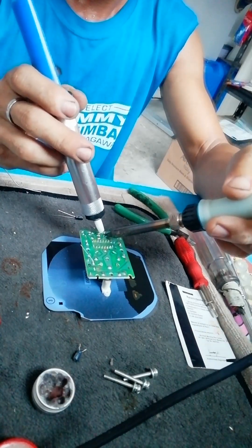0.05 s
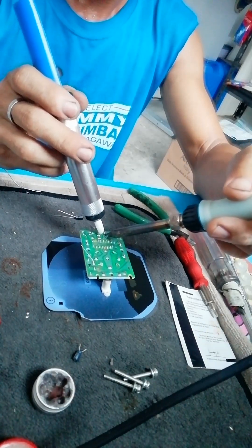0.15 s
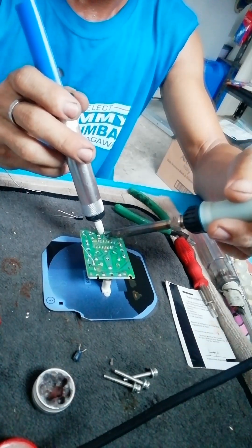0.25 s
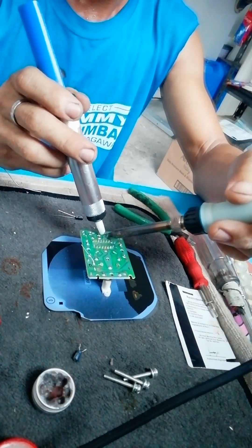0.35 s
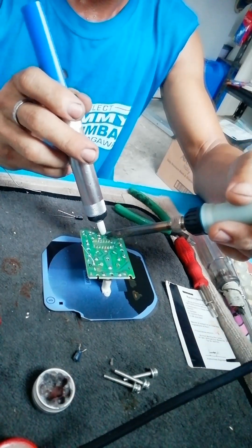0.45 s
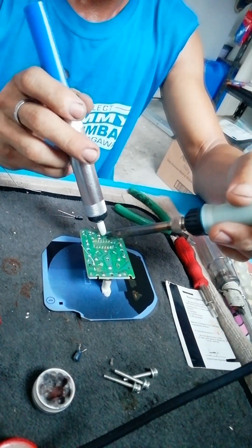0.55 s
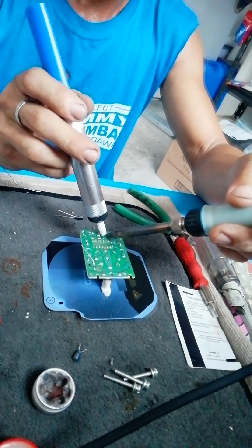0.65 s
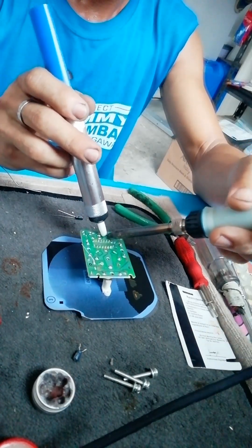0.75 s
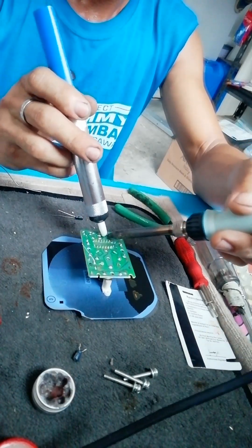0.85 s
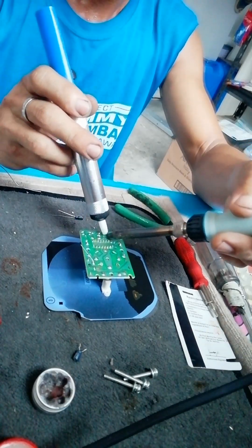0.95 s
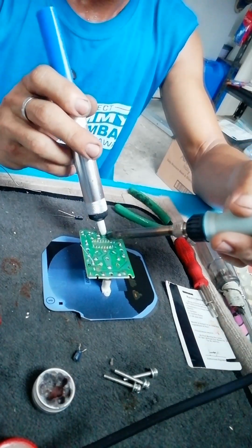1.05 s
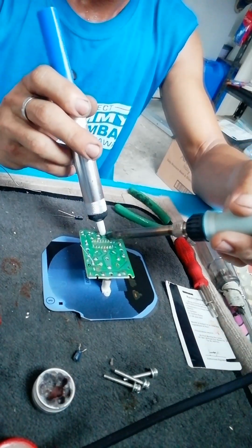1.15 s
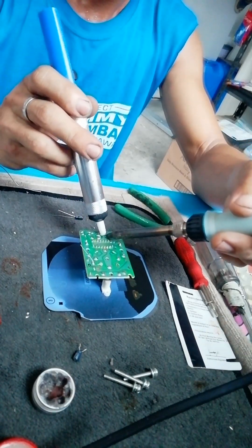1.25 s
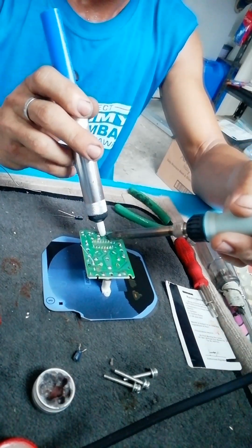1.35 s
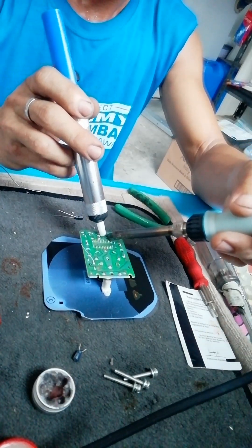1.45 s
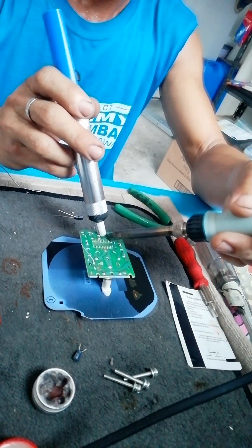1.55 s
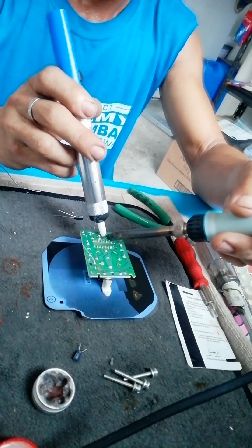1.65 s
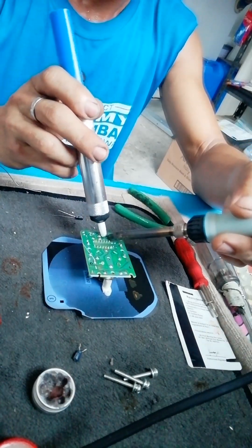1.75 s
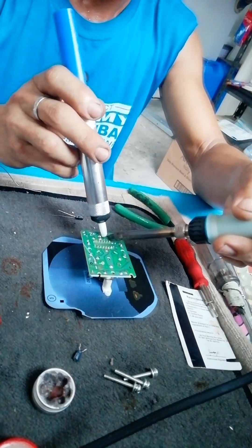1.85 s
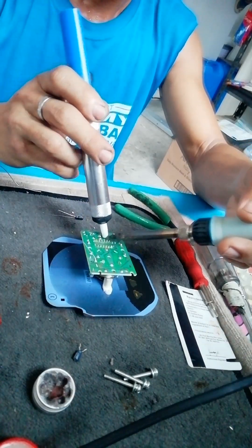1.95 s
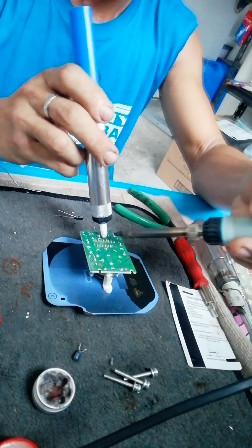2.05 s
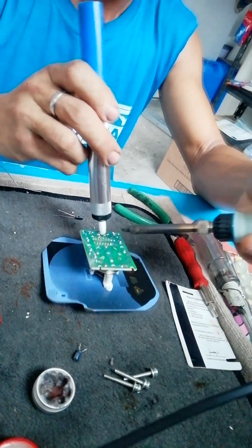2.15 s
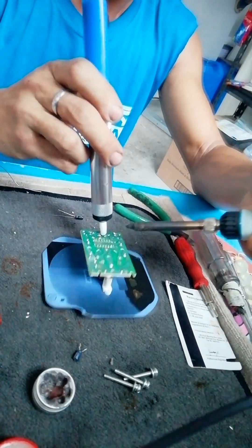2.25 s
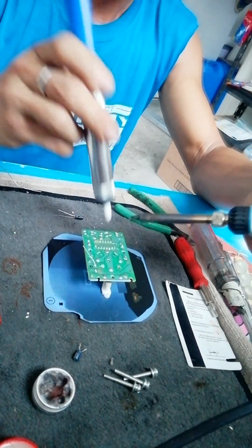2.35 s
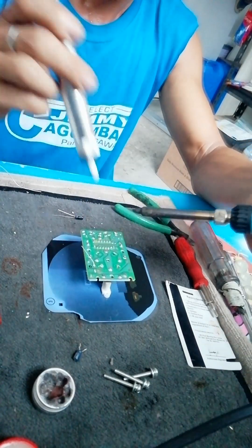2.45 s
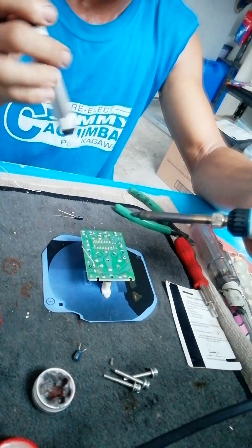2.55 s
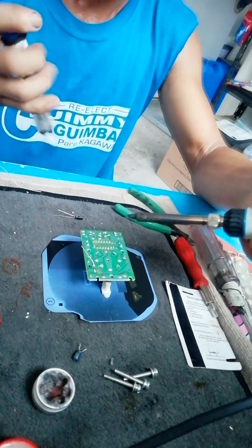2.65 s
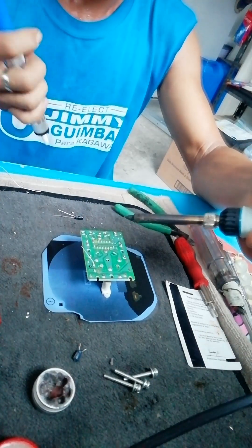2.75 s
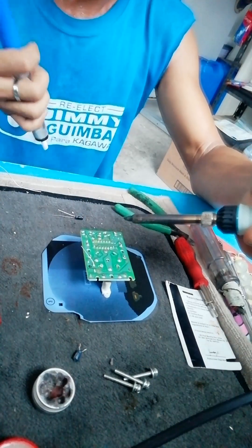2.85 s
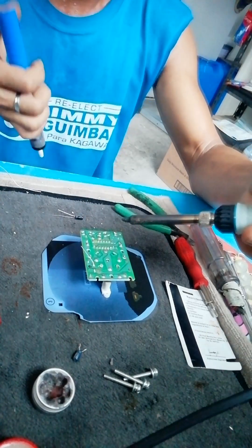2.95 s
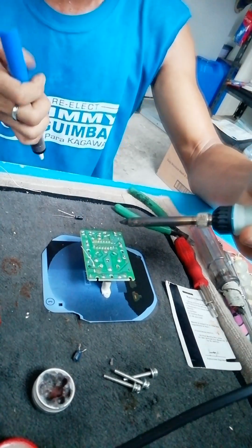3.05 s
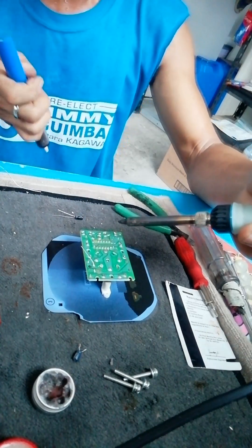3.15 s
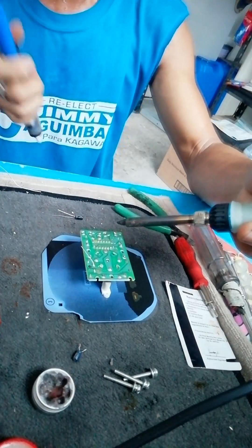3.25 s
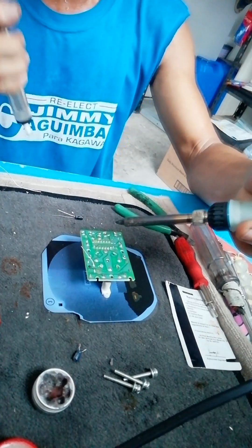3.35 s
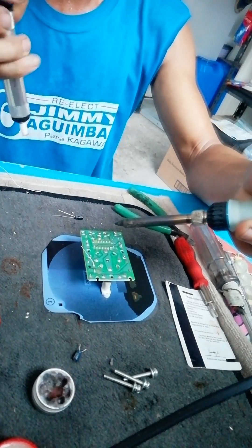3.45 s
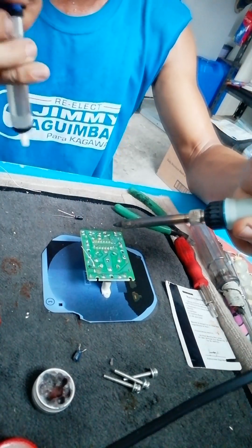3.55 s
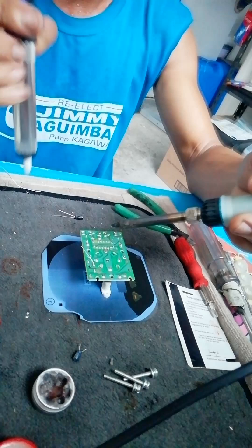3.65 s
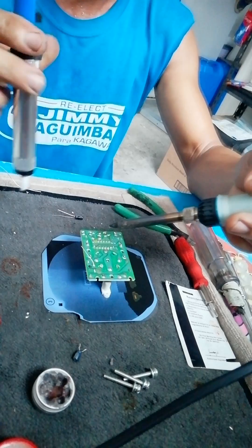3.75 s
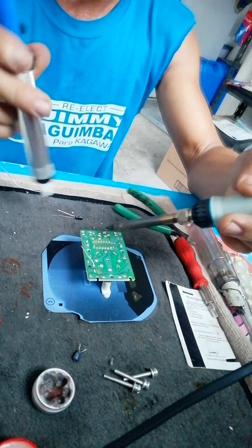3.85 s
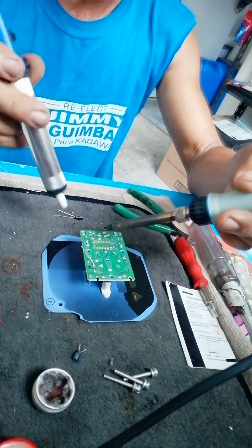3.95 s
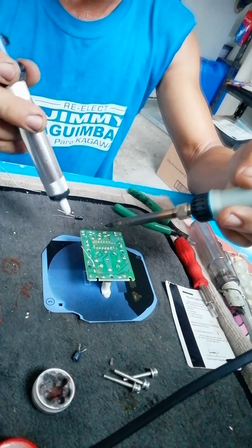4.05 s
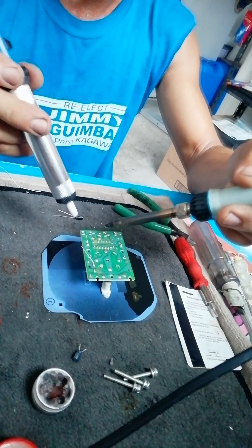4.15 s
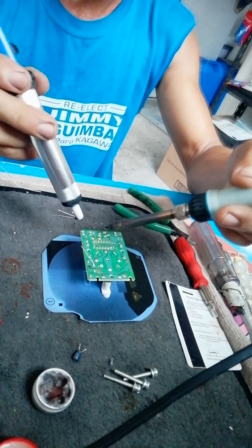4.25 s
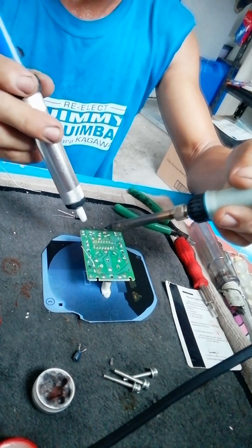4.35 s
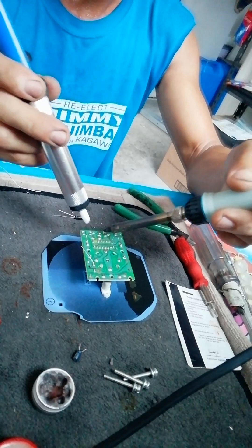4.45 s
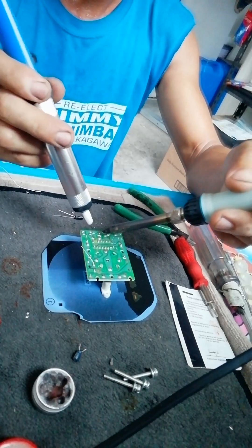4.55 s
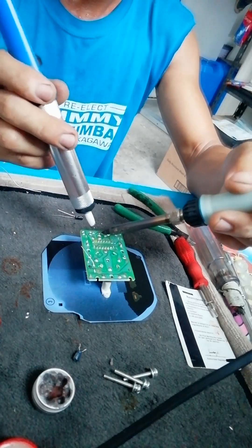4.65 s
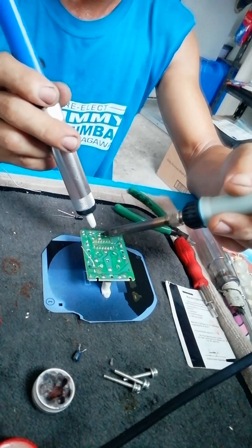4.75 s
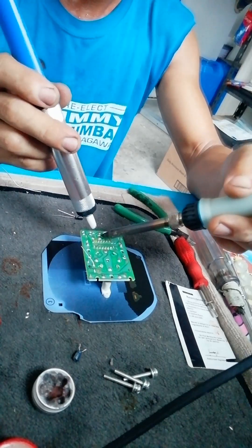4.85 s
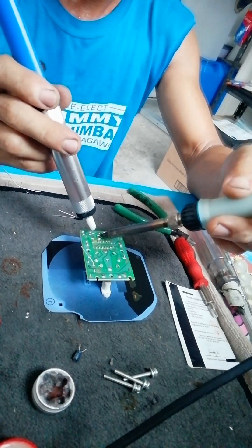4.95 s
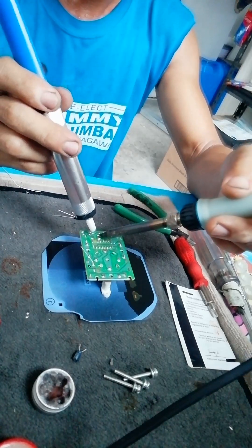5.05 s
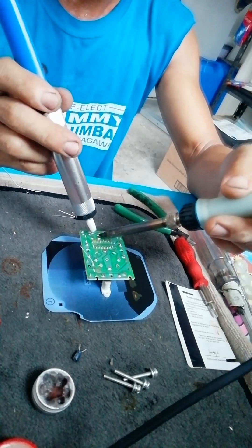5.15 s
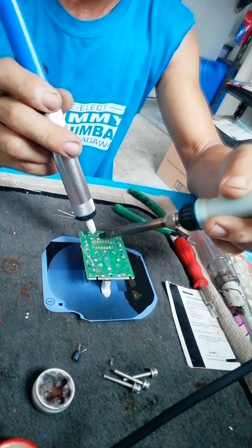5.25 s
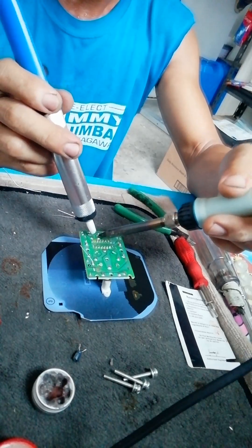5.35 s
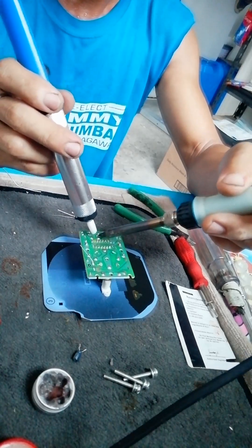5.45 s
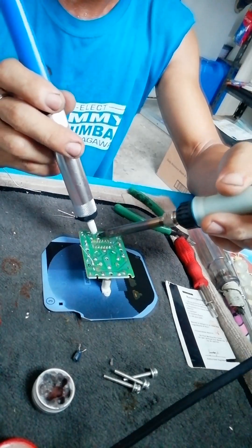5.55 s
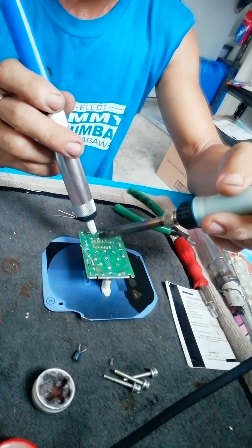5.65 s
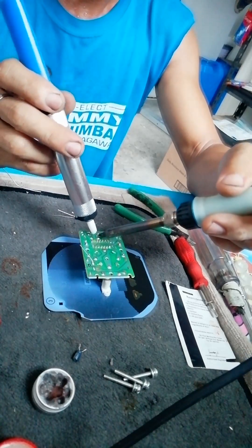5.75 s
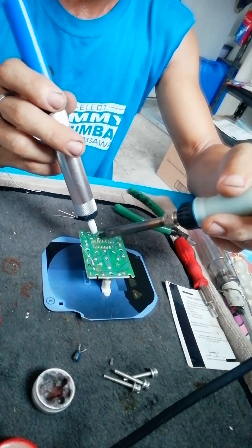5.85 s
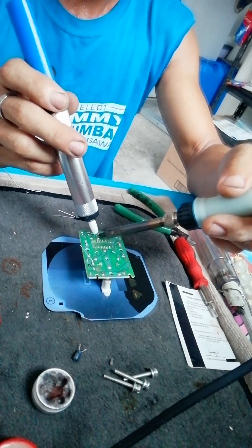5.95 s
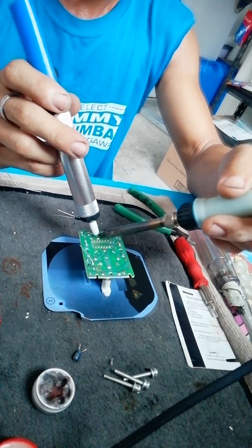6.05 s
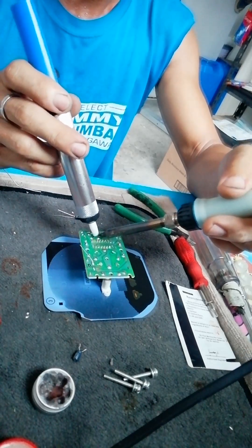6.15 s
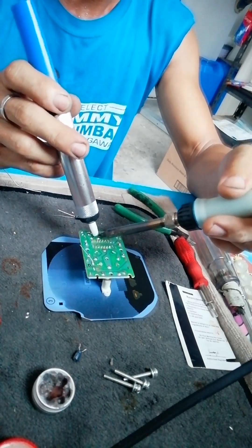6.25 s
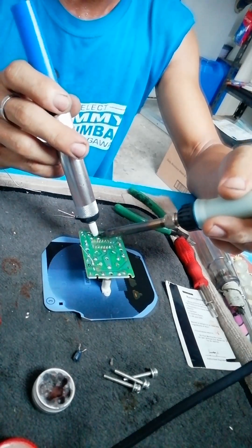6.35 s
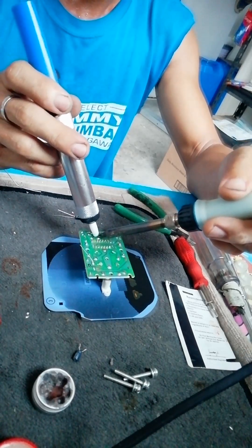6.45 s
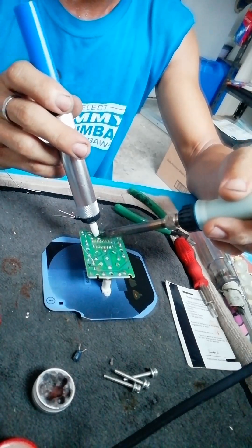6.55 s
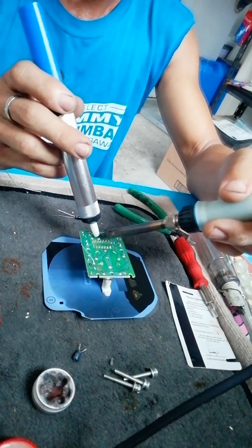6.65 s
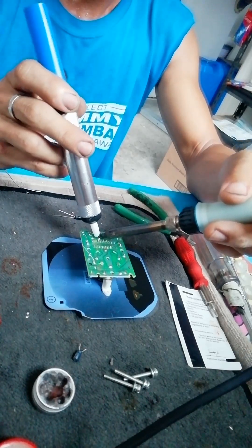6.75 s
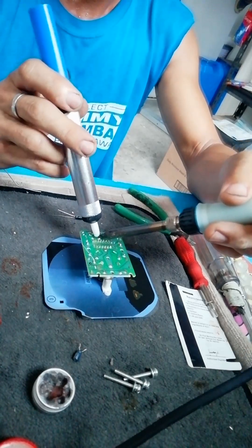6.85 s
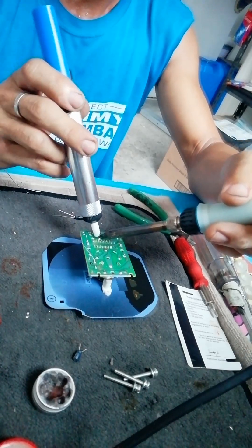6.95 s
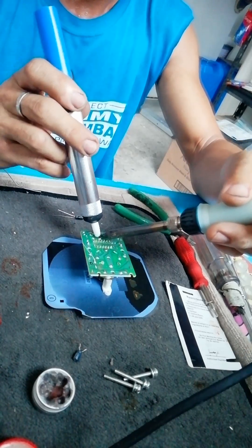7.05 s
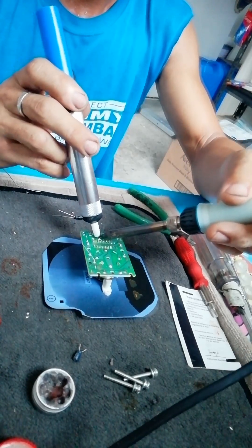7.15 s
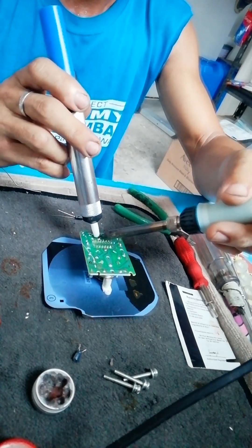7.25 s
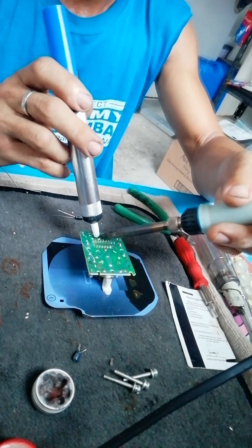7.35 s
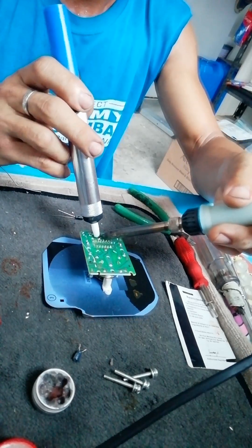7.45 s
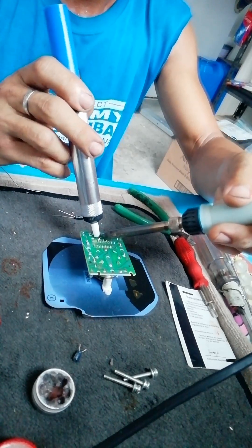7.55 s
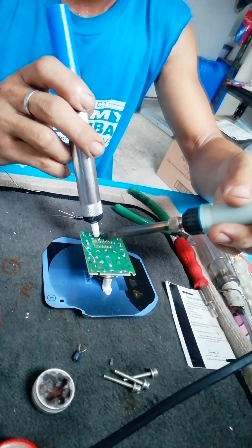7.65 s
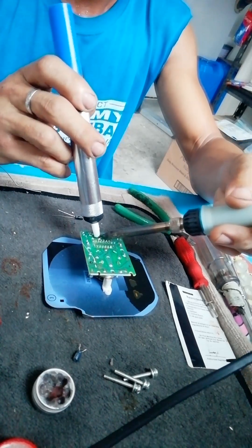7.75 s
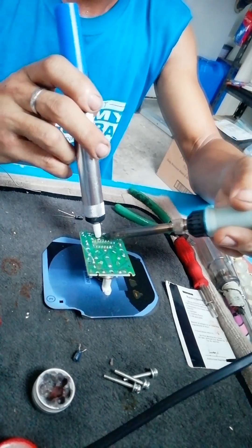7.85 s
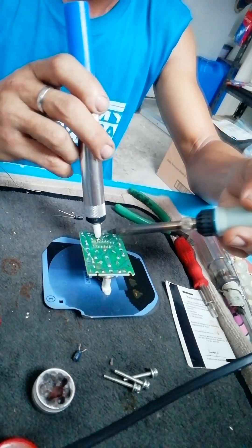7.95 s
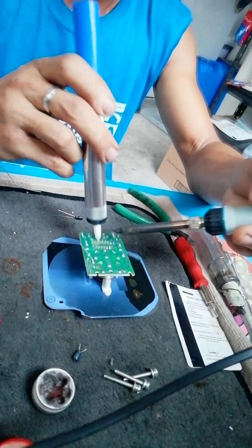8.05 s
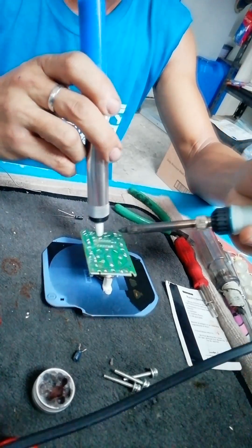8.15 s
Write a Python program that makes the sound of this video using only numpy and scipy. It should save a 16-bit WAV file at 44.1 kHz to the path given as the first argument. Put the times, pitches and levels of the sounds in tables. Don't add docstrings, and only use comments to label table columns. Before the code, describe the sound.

A quiet small hard room with a faint geared motor throbbing over mains hum and airy hiss. After about two seconds a desoldering pump fires: loud bright metallic snap, short sputtering suction puff. A second later its plunger is knocked down and latches with a click, the bench thudding softly. Tiny ticks follow, then a second snap at the very end. Close stereo phone microphone.

```python
import sys
import numpy as np
from scipy import signal
from scipy.fft import rfft, irfft
from scipy.io import wavfile
from scipy.ndimage import uniform_filter1d

SR = 44100
rng = np.random.default_rng(int(sys.argv[2]) if len(sys.argv) > 2 else 0)


def invert_db(level):
    return 10 ** (np.asarray(level, dtype=float) / 20)


def generate_wav(sig):
    pcm = np.round(np.clip(np.atleast_2d(sig).T, -1, 1) * 32767).astype(np.int16)
    wavfile.write(sys.argv[1], SR, pcm)


N = 361238
FREQS = np.maximum(np.fft.rfftfreq(N, 1 / SR), 1)
TIME = np.arange(N) / SR


def read(table, hz=FREQS):
    points = np.array(table)
    return np.interp(np.log(hz), np.log(points[:, 0]), points[:, 1])


def unit(x):
    return x / np.sqrt(np.mean(x ** 2))


def band(x, hz, width_hz):
    return signal.lfilter(*signal.iirpeak(np.clip(hz, 20, .45 * SR), hz / width_hz, SR), x)


def walk(rate):
    hold = int(SR / rate)
    steps = np.repeat(rng.standard_normal(N // hold + 1), hold)
    return 1.23 * uniform_filter1d(uniform_filter1d(steps, hold), hold)[:N]


def swells(events):
    gain = 0
    for s, db, up_db, down_db in events:
        slope_db = np.where(TIME < s, up_db, down_db)
        gain = gain + invert_db(db - slope_db * np.abs(TIME - s))
    return gain


def add(out, sound, s, pan_db):
    for port, part, side, lag_s in zip(out, sound, [1, -1], [0, 0.00062]):
        i = int((s + lag_s) * SR)
        part = part[:N - i]
        port[i:i + len(part)] += part * invert_db(side * pan_db / 2)


def far_field(make):
    alike_hz, bass_hz, lag_s = 1390, 252, 0.00086
    left, other = rfft(make()), rfft(make())
    alike = 1 / (1 + (FREQS / alike_hz) ** 2)
    lag = lag_s / (1 + (bass_hz / FREQS) ** 2)
    right = alike * left * np.exp(-2j * np.pi * FREQS * lag) + np.sqrt(1 - alike ** 2) * other
    return irfft([left, right], N)


def air():
    # frequency in Hz, level in dB per Hz.
    air_colour = [(13, -49.5), (22, -2), (121, -5), (169, -10), (345, -15), (614, -15), (705, -14.5),
                  (1260, -24), (1360, -30.5), (1610, -12.5), (2120, -27), (2370, -23), (5710, -33.5),
                  (8160, -31.5), (15800, -58)]
    # peak in seconds, level in dB, swell and fade in dB per second.
    gusts = [(1.71, -38, 42.5, 170), (2.74, -53, 40.5, 38), (3.53, -34, 81, 141.5), (3.78, -40.5, 120, 27),
             (4.45, -45.5, 22, 9), (4.93, -49, 31, 52.5), (6.57, -46, 158, 67.5), (6.87, -45.5, 37, 240),
             (7.73, -45.5, 25.5, 55), (7.98, -52, 30, 80)]
    flicker = invert_db(.7 * walk(9))
    hiss = far_field(lambda: irfft(rfft(rng.standard_normal(N) * flicker) * invert_db(read(air_colour)), N))
    buffeting = unit(band(band(rng.standard_normal(N), 35.0, 49), 35.0, 49))
    still_air = invert_db(-61.5)
    return unit(hiss) * invert_db(-50) + buffeting * (still_air + invert_db(-8.5) * swells(gusts))


def gear_knocks(turn, gear_hz):
    # share of the turn, frequency in Hz, width in Hz, level in dB,
    # fade in seconds.
    teeth = [(0.545, 1270, 170, -53, 0.043), (0.51, 1900, 150, -54, 0.016), (.56, 894, 71, -56, 0.039),
             (0.66, 1084, 52, -64.5, 0.03814), (0.962, 1300, 70, -62.5, 0.037),
             (0.68, 1900, 120, -54.5, .015), (.7, 2600, 210, -57.5, 0.021), (0.75, 3000, 91, -69, 0.022),
             (.84, 3440, 82, -74, 0.033), (.87, 3000, 88, -65, 0.033), (0.64, 3470, 1230, -57, 0.077),
             (0.73, 5600, 2400, -65.5, 0.087), (0.22, 1870, 56, -59, .035), (0.017, 2000, 99, -60.5, 0.033),
             (0.29, 1450, 100, -60.5, .03)]
    # frequency in Hz, width in Hz, level in dB.
    casing = [(1600, 250, 6.5), (1922, 28, 1), (2308.3, 30, -6.5), (981.7, 49, -12.5)]
    shape = (int(turn[-1]) + 2, len(teeth))
    strength_db = rng.standard_normal(shape)

    def at_one_port():
        total, start = 0, 2 * np.pi * rng.random(shape)
        for k, (share, hz, width_hz, db, fade_s) in enumerate(teeth):
            since = (turn - share) % 1 / gear_hz
            which = np.floor(turn - share + 1).astype(int)
            gate = (1 - np.exp(-since / 0.0056)) * np.exp(-since / fade_s)
            gate = gate * invert_db(db + strength_db[which, k])
            scrape = band(gate * rng.standard_normal(N), hz, width_hz) * np.sqrt(SR / np.pi / width_hz)
            total = total + .7 * scrape
            if width_hz < 500:
                phase = 2 * np.pi * hz * since + start[which, k] + 1.6 * walk(160)
                total = total + .95 * gate * np.sin(phase)
        for hz, width_hz, db in casing:
            whirr = unit(band(rng.standard_normal(N), hz, width_hz))
            total = total + invert_db(db - 66.5 + 2.0 * walk(15)) * whirr
        return total

    return far_field(at_one_port)


def motor():
    # multiple of the shaft speed, level in dB.
    shaft_orders = [(2, -59), (3, -63.5), (4, -57), (6, -69.5), (7, -70), (8, -68.5), (9, -67), (10, -68.5),
                    (12, -71.5), (14, -69.5), (15, -70), (18, -73), (21, -75.5), (30, -76), (42, -74.5),
                    (48, -73)]
    gear_hz = 5.838
    turn = TIME * gear_hz
    tones = 0
    for multiple, db in shaft_orders:
        phase = 2 * np.pi * (4 * multiple * turn + rng.random()) + 0.88 * walk(5)
        tones = tones + np.sqrt(2) * invert_db(db + 1.85 * walk(4)) * np.sin(phase)
    hum = np.sqrt(2) * invert_db(-53 + 1.13 * walk(0.82)) * np.sin(2 * np.pi * 120.2 * TIME)
    return gear_knocks(turn, gear_hz) + tones + hum


def room(near):
    # frequency in Hz, time to fall 60 dB in seconds.
    room_t60 = [(200, 0.15), (1000, 0.29), (3000, 0.25), (8000, 0.35), (15000, 0.21)]
    t, tail = TIME[:SR // 2], 0
    for hz in 150 * 2 ** np.arange(0, 6.8, .5):
        echoes = unit(band(rng.standard_normal((2, len(t))), hz, hz / 1.3))
        tail = tail + np.sqrt(hz) * echoes * 1000 ** (-t / read(room_t60, hz))
    tail = tail * (1 - np.exp(-(t / 0.002) ** 2))
    tail = tail / np.sqrt(np.sum(tail ** 2, axis=1, keepdims=True))
    return invert_db(-8) * signal.fftconvolve(near.mean(axis=0, keepdims=True), tail, axes=1)[:, :N]


def shudders():
    # start in seconds, length in seconds, level in dB, pitch in Hz.
    leans = [
        (3.454, .05, -27.5, 82.2),
        (3.514, .09, -32, 89.93),
        (3.76, 0.042, -37, 78),
    ]
    edge_s, sag_db_s = 0.011405, 44.5
    out = 0
    for s, length, db, hz in leans:
        since = TIME - s
        lean = np.clip(np.minimum(since, length - since) / edge_s + .5, 0, 1) ** 2
        level = np.sqrt(2) * invert_db(db - sag_db_s * np.clip(since, 0, length))
        out = out + level * lean * np.sin(2 * np.pi * hz * since)
    return out


def ticks():
    # start in seconds, peak in dB, left minus right in dB, centre in Hz.
    light_ticks = [(2.555, -48, 0, 6000), (2.735, -36, -1.5, 5358), (2.883, -38, 7, 4860),
                   (2.975, -40.5, -2, 6000), (4.5527, -38, 3, 1290), (5.1505, -37, -4, 1700),
                   (7.226, -43, -2, 7000), (7.248, -39, 1.5, 9000), (7.2508, -33, 6, 11950),
                   (7.4965, -52, 3, 12000), (7.7034, -39, 6, 9956)]
    out, t = np.zeros((2, N)), TIME[:SR // 50]
    for s, db, pan_db, hz in light_ticks:
        width_hz = .9 * hz * min(hz / 4000, 1) ** 2
        click = rng.standard_normal((2, len(t))) * np.exp(-t / 0.001)
        click = band(band(click, hz, width_hz), hz, width_hz)
        add(out, invert_db(db) * click / np.abs(click).max(), s, pan_db)
    return out


def slides():
    # peak in seconds, level in dB, swell and fade in dB per second.
    rubs = [
        (3.127, -35.5, 420, 9000),
        (3.075, -57.5, 110, 300),
        (3.746, -68, 150.5, 400),
        (3.8, -60.5, 600, 155.5),
    ]
    grains = rng.standard_normal((2, N)) * invert_db(1.8 * rng.exponential(size=N))
    rub = band(grains, 7533, 3500)
    rub = rub + invert_db(-5) * band(grains, 4100, 1500)
    rub = rub + invert_db(-28.5) * band(grains, 12500, 5000)
    return unit(rub) * swells(rubs)


def suction():
    # start in seconds, level in dB, time to fall 60 dB in seconds.
    rushes = [
        (2.1985, -32.5, 0.23),
        (2.2098, -27.5, 0.21),
        (8.14, -31.5, 0.2),
        (8.153, -35, 0.12),
    ]
    # frequency in Hz, level in dB per Hz.
    rush_colour = [(88, -41), (150, -8.5), (249, 2.5), (601, 0.5), (821, -23.5), (1060, 0), (1290, -7.5),
                   (8400, -8), (16000, -20.5)]
    sputter = invert_db(2.7 * walk(300))
    rush = irfft(rfft(rng.standard_normal((2, N)) * sputter) * invert_db(read(rush_colour)), N)
    fade = 0
    for s, db, t60 in rushes:
        fade = fade + invert_db(db) * (TIME > s) * 1000 ** -np.clip((TIME - s) / t60, 0, 9)
    return unit(rush) * fade


def contacts(actions, steps):
    chain = []
    for s, db, stretch, pan_db, bright_db in actions:
        for ms, step_db, step_pan_db, thud_db, rattle_ms in steps:
            when = s + stretch * ms / 1000
            chain.append((when, db + step_db, pan_db + step_pan_db, thud_db, rattle_ms, bright_db))
    return chain


def pump(chain, modes, wall_hz, spring_db, thud_hz, thud_width_hz):
    # frequency in Hz, width in Hz, level in dB, time to fall 60 dB in seconds.
    coil_modes = [(3500, 250, -2, .09), (3720, 250, -4, .1), (4780, 200, -2, .19), (8300, 1200, -5, .12)]
    out, t = np.zeros((2, N)), TIME[:SR // 5]
    thin_wall = signal.butter(4, wall_hz, "high", fs=SR, output="sos")
    for s, db, pan_db, thud_db, rattle_ms, bright_db in chain:
        noise = rng.standard_normal((2, len(t)))
        grains = noise * invert_db(3.33 * rng.exponential(size=len(t)))
        rattle = grains * np.exp(-(t * 1000 / rattle_ms) ** 2)
        tube = 0
        for k, (hz, width_hz, mode_db) in enumerate(modes):
            level = invert_db(mode_db + bright_db * np.log2(hz / 6000))
            tube = tube + (-1) ** k * level * band(rattle, hz, width_hz)
        tube = signal.sosfilt(thin_wall, tube)
        spring = 0
        for hz, width_hz, mode_db, t60 in coil_modes:
            chatter = unit(band(noise[:, ::-1], hz, width_hz))
            spring = spring + invert_db(mode_db) * chatter * 1000 ** (-t / t60)
        push = np.exp(-.5 * ((t - .0004) / .0001) ** 2) + 0.11 * rattle
        thud = band(band(push, thud_hz, thud_width_hz), thud_hz, thud_width_hz)
        thud = thud + invert_db(-3.5) * band(push, 280, 140)
        hit = tube / np.abs(tube).max() + invert_db(spring_db) * spring - invert_db(thud_db) * thud / thud.max()
        add(out, invert_db(db) * hit, s, pan_db)
    return out


def latching():
    # peak in seconds, level in dB, time stretch, left minus right in dB,
    # brightness in dB per octave.
    latches = [
        (3.2869, -14, 1.0, 0.1, 3),
    ]
    # ms from the loudest, level in dB, left minus right in dB, thud in dB, rattle in ms.
    catch = [
        (-7.5, -3.5, 5, -40, 2.8),
        (-3, 0, -2, -40, 2.675),
        (0, 1.5, -0.5, -15.5, 2.4),
        (12, -10.5, -2.5, -40, 3),
    ]
    # frequency in Hz, width in Hz, level in dB.
    modes = [(3734.3, 580, 0), (5320, 289.9, -0.5), (5825.6, 207.7, -1), (8000, 910, -7.5),
             (9280, 400, -2.5), (13000, 3300, -24.5)]
    return pump(contacts(latches, catch), modes, wall_hz=3040, spring_db=-31, thud_hz=511.25, thud_width_hz=390)


def cocking():
    cocks = [
        (3.1291, -6.5, 0.98, -1.5, -1),
    ]
    strokes = [
        (-26, -17.5, 0, -40, 0.93),
        (-5.5, -22.5, 0, -40, 3),
        (0, 2.5, 2, -33, 1.256),
        (10, -6, -2.2, -40, 2),
        (36, -17.5, 0, -14, 2),
        (130, -31, 0, -40, 2),
    ]
    # frequency in Hz, width in Hz, level in dB.
    modes = [(3555.6, 260, 4.5), (4834.7, 440, -2), (6100, 900, -10.5), (8500, 750, -9), (9415, 510, -11),
             (12500, 4141, -34)]
    return pump(contacts(cocks, strokes), modes, wall_hz=3040, spring_db=-26.5, thud_hz=500, thud_width_hz=500)


def firing():
    shots = [
        (2.1977, -2, 1.0, -1, 0.7),
        (8.1398, -3.5, 1.14, 0.1, 2.5),
    ]
    slam = [
        (-3.5, -18, -9, -40.5, 3.8),
        (0, 0.5, 2, -26, 1.7),
        (2.5, -7.5, -11, -28, 1.3),
        (12, -12, 7, 0.5, 3),
        (16, -13, -6, -9, 2.7),
        (21.5, -24, -11, -4, 1.8),
        (28.5, -23, 0, -1, 2),
    ]
    # frequency in Hz, width in Hz, level in dB.
    modes = [(3470, 270, 1), (4560, 350, -1.5), (5460, 651, -2.5), (7722, 500, -3), (9143.3, 490, -3.5),
             (10890, 600, -9), (13100, 4600, -18), (2220, 700, -10)]
    return pump(contacts(shots, slam), modes, wall_hz=2000, spring_db=-60, thud_hz=800, thud_width_hz=2500)


def scene():
    near = firing() + cocking() + latching() + ticks() + slides()
    return air() + motor() + room(near) + shudders() + suction() + near


def roll_off(x):
    return signal.sosfilt(signal.butter(12, 16780, fs=SR, output="sos"), x)


def record(dry):
    # frequency in Hz, left minus right in dB.
    port_tilt = [(200, 0), (400, -.5), (700, 2), (1300, -1), (2400, 1), (4400, 0), (15000, .5)]
    tilt_db = read(port_tilt) / 2
    self_noise = invert_db(-78) * rng.standard_normal((2, N))
    heard = rfft(dry + self_noise) * (FREQS < 15940)
    mix = irfft(heard * invert_db(np.array([tilt_db, -tilt_db])), N)
    return roll_off(mix)


dry = scene()
out = record(dry)
generate_wav(out)
```